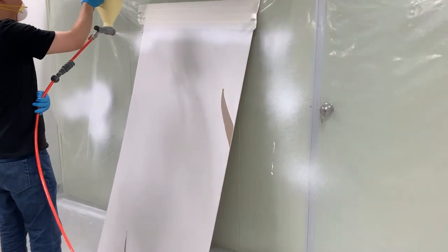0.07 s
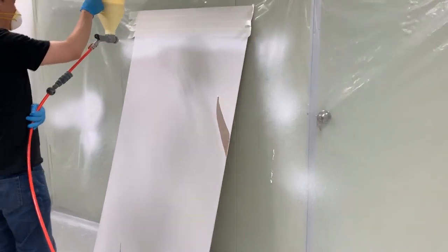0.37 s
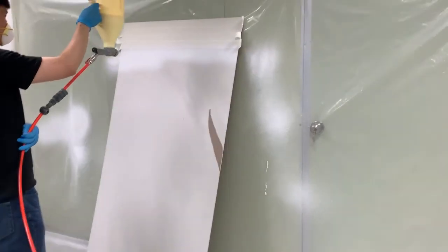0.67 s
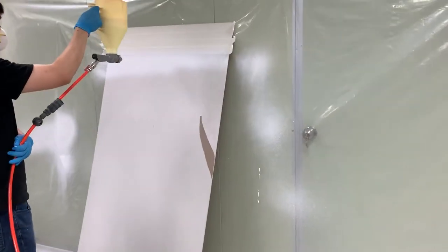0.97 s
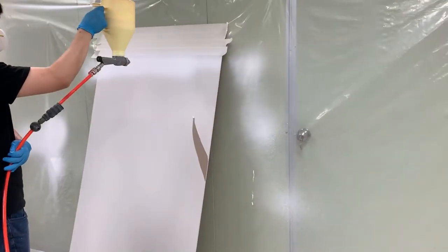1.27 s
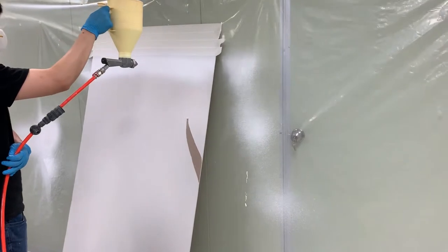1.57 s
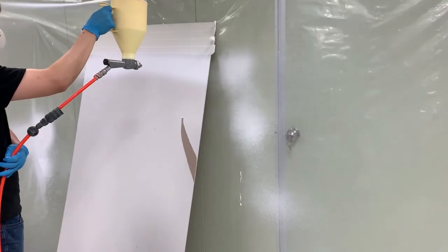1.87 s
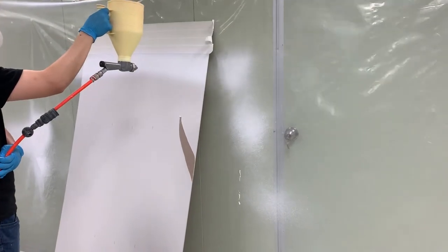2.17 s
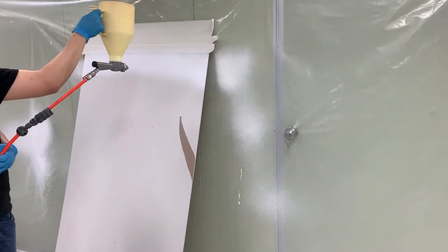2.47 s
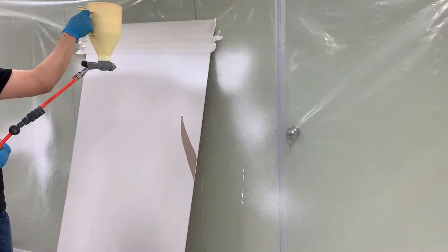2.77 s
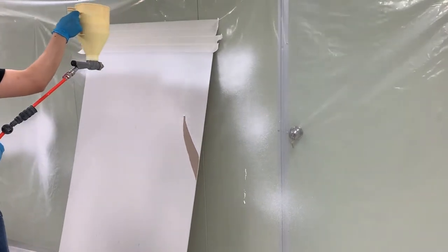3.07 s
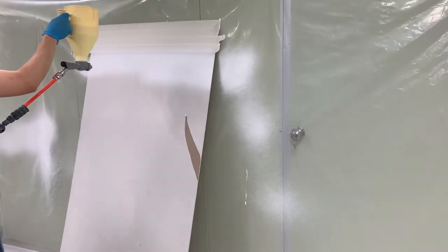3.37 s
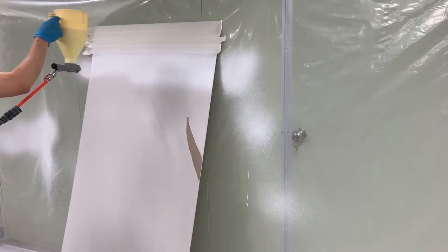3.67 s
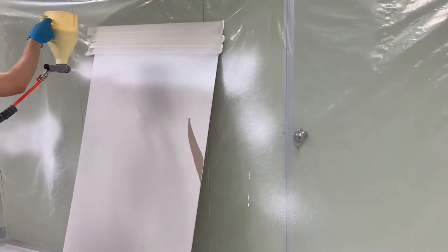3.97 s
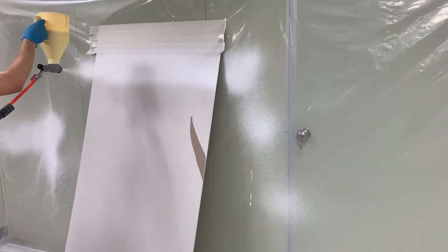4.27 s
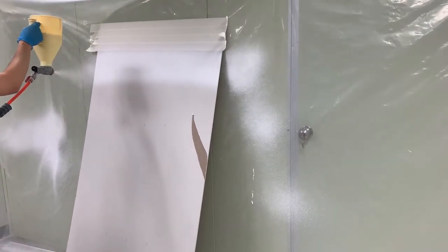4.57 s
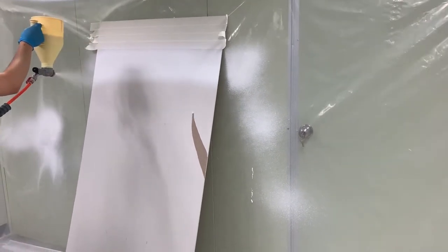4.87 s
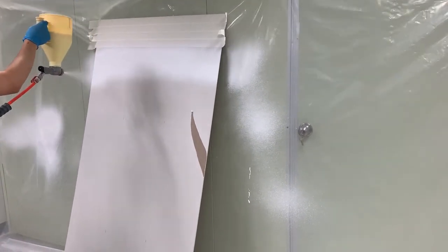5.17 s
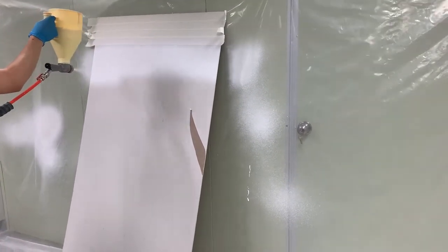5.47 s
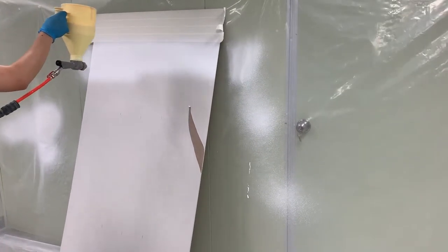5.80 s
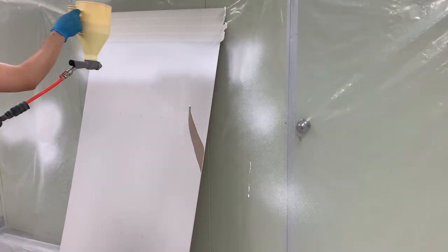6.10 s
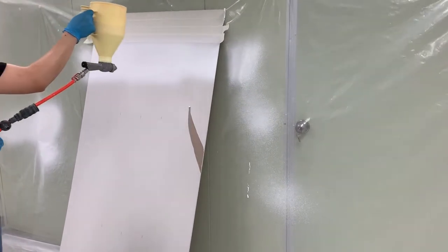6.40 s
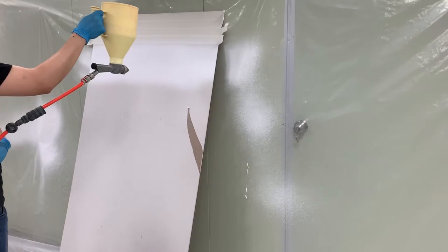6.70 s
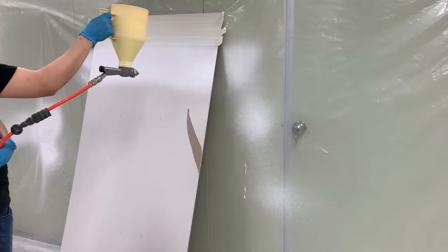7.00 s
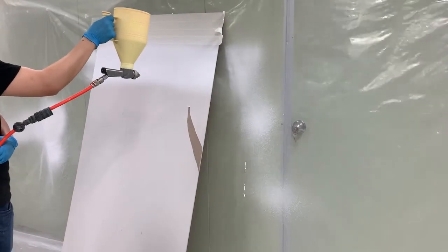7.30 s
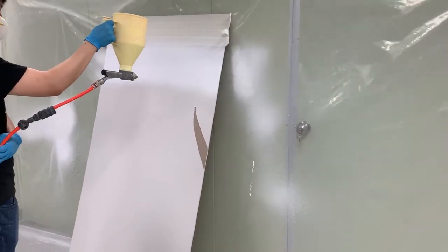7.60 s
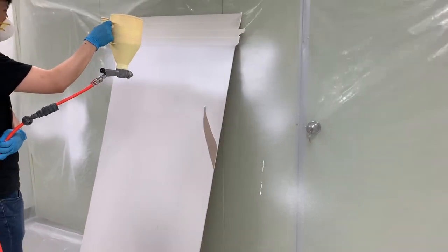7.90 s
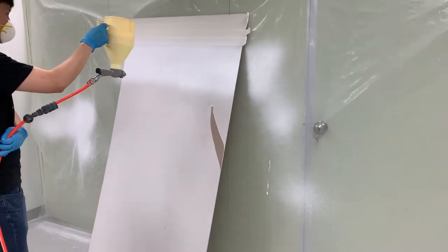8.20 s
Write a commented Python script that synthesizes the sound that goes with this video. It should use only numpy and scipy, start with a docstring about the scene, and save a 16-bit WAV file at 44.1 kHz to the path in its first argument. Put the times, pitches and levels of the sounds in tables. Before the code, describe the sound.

A compressed-air hopper gun sprays mortar onto a panel in a plastic-lined room. Its dense, bright hiss runs without a break, fluttering slightly and carrying a fine sputter of droplets. As the gun sweeps toward the panel and back, the hiss swishes and its hollow tone shifts, wavering most on two close passes. A faint low rumble lies behind it, and the spray sounds wide in stereo.

```python
"""A compressed-air hopper gun sprays mortar on a leaning panel in a plastic-lined room.
Its turbulent jet hisses, flutters with the uneven feed and spits droplets. As the gun sweeps up to
the panel and back, near surfaces return the hiss with changing delays, so it swishes. The top treble
beams straight at the microphone pair; the rest arrives scattered off the sheeting.
Behind it the room rumbles and booms in two low modes."""
import sys
import numpy as np
from scipy import signal
from scipy.fft import rfft, irfft
from scipy.io import wavfile
from scipy.ndimage import uniform_filter1d

SR = 44100
rng = np.random.default_rng(int(sys.argv[2]) if len(sys.argv) > 2 else 0)


def pcm_store(signal):
    """Save signal as 16-bit PCM."""
    levels = np.round(np.clip(np.atleast_2d(signal), -1, 1) * 32767)
    wavfile.write(sys.argv[1], SR, levels.astype(np.int16).T)


N = 363825
TIME, FREQS = np.arange(N) / SR, np.fft.rfftfreq(N, 1 / SR)
FRAME, OVERLAP = 2048, 1536  # samples


def amp(db):
    """Decibels to gain."""
    return 10 ** (np.asarray(db) / 20)


def read(points, hz):
    """A spectrum table at the given frequencies, on a log axis."""
    f, value = np.transpose(points)
    return np.interp(np.log(hz + 1), np.log(f + 1), value)


def follow(rows, t):
    """Each column of a curve table at the given times."""
    times, *columns = np.transpose(rows)
    return [np.interp(t, times, column) for column in columns]


def about_mean(curve, t):
    """A level curve in dB above its own mean, as a column."""
    level_db = follow(curve, t)[0]
    return (level_db - level_db.mean())[:, None]


def swell(t, middle, length):
    """A smooth rise from 0 to 1 and back."""
    return np.cos(np.pi * np.clip((t - middle) / length, -.5, .5)) ** 2


def bell(hz, centre_hz, octaves):
    """A bell-shaped band of height 1 on a log axis."""
    return np.exp(-(np.log2((hz + 1) / centre_hz) / octaves) ** 2)


def wander(low_hz, high_hz):
    """Random motion of rms 1 between two rates."""
    shape = FREQS / (FREQS + low_hz) / (1 + (FREQS / high_hz) ** 2)
    x = irfft(rfft(rng.standard_normal(N)) * shape, N)
    return x / x.std()


def white_frames():
    """Times, frequencies and short-time spectra (frames, bins) of noise at 0 dB per Hz."""
    noise = rng.standard_normal(N) * np.sqrt(SR / 2)
    hz, t, spectra = signal.stft(noise, SR, nperseg=FRAME, noverlap=OVERLAP)
    return t, hz, spectra.T


def to_sound(spectra):
    """Short-time spectra back to samples."""
    return signal.istft(np.swapaxes(spectra, -1, -2), SR, nperseg=FRAME, noverlap=OVERLAP)[1][..., :N]


def delayed(ms, hz):
    """Phase turn of a moving delay, (frames, bins)."""
    return np.exp(-2j * np.pi * ms[:, None] * hz / 1000)


# room tone, alike at both microphones: (frequency [Hz], relative level [dB])
ROOM_RUMBLE = [(10, -84), (30, -84), (42, -58), (70, -72), (82, -59), (100, -62), (118, -67), (135, -70.5),
               (175, -88), (207, -68.5), (245, -90), (600, -110)]
# the room's two modes: (lower [Hz], upper [Hz])
MODE_HZ = [47.3, 63.5]
# their resting levels: (lower [dB], upper [dB])
MODE_REST_DB = [-46, -46.3]
# their swells: (middle [s], length [s], lower lift [dB], upper lift [dB])
MODE_SWELLS = [(.36, 0.75, -1, 11.5), (1.8, 0.46, 5, 7.5), (2.8, 0.32, 6, -3), (3.245, 0.92, 6.5, 2),
               (3.69, 0.42, 11, -12), (4.22, .5, 3, 6), (4.88, 0.42, 2, 8), (5.28, .25, -2, 7),
               (5.606, 0.38, 13, -5), (6.167, .65, 9.5, 6), (6.797, .55, 8, -2), (8.1, .45, 8.5, 5)]


def room_drone(waver_hz=.7, unsteady_db=1.7):
    """Low noise fills the room and booms in two modes, each wavering in pitch and level."""
    noise = rng.standard_normal(N) * np.sqrt(SR / 2)
    drone = irfft(rfft(noise) * amp(read(ROOM_RUMBLE, FREQS) - 1.1), N)
    lifts_db = sum(np.outer(lifts, swell(TIME, middle, length)) for middle, length, *lifts in MODE_SWELLS)
    for mode_hz, rest_db, lift_db in zip(MODE_HZ, MODE_REST_DB, lifts_db):
        rms = amp(rest_db + lift_db + unsteady_db * wander(1.4, 6.8))
        pitch_hz = mode_hz + waver_hz * wander(.61, 4.1)
        drone += rms * np.sqrt(2) * np.sin(2 * np.pi * np.cumsum(pitch_hz) / SR)
    return drone


# two reflections, lagging the direct hiss as the gun sweeps: (time [s], far delay [ms], near delay [ms])
ECHO_DELAYS = [(0, 2.24, 1.63), (.75, 2.29, 1.75), (1.25, 2.416, 1.95), (1.7, 2.488, 2.06),
               (2.15, 2.688, 2.01), (2.55, 2.608, 1.98), (3, 2.47, 1.9), (3.4, 2.422, 1.82),
               (3.7, 2.386, 1.76), (4.05, 2.336, 1.66), (4.55, 2.324, 1.57), (5.2, 2.416, 1.68),
               (6, 2.586, 1.86), (6.55, 2.666, 1.98), (6.9, 2.768, 2.15), (7.35, 2.784, 2.08),
               (7.8, 2.652, 1.95), (8.25, 2.558, 1.8)]
# the gun passes close to the panel: (middle [s], length [s])
PANEL_PASSES = [(2.1, 1.6), (7.4, 0.77)]
# mid-sweep, the far reflection aims at the microphones: (middle [s], length [s])
ON_AXIS_PASSES = [(1.1, 1.2), (3.4, 2.4), (6.35, 1.4), (8.1, 0.83)]
# what the far path carries: (frequency [Hz], relative strength [ratio])
FAR_PATH = [(400, .1), (1000, .85), (2000, .9), (3200, .65), (6000, .5), (8500, 1), (13000, 1.05)]
# the near path, gun at the panel: (frequency [Hz], relative strength [ratio])
NEAR_PATH_CLOSE = [(1200, 0.18), (2200, 0.53), (3800, 1), (6000, 0.24), (9000, 0.95), (13000, 0.43)]
# the near path, gun drawn back; negative comes back inverted: (frequency [Hz], strength [ratio])
NEAR_PATH_BACK = [(250, 0.1), (500, 0.0059), (1100, -0.021), (2200, -0.18), (4000, 0.01)]


def reflections(t, hz, off_axis=.16, on_axis=.29, at_panel=.65):
    """Two echoes comb the hiss; the teeth slide with the gun, and at the panel the near one takes over."""
    far_ms, near_ms = follow(ECHO_DELAYS, t)
    close = sum(swell(t, *row) for row in PANEL_PASSES)[:, None]
    aimed = sum(swell(t, *row) for row in ON_AXIS_PASSES)[:, None]
    far = (1 - close) * np.interp(aimed, [0, 1], [off_axis, on_axis]) * read(FAR_PATH, hz)
    near = close * at_panel * read(NEAR_PATH_CLOSE, hz) + (1 - close) * read(NEAR_PATH_BACK, hz)
    comb = 1 + far * delayed(far_ms, hz) + near * delayed(near_ms, hz)
    return comb / np.sqrt(1 + far ** 2 + near ** 2)


# the plastic around the room, which lets low notes through: (frequency [Hz], relative reflection [ratio])
SHEETING_RETURN = [(300, .2), (1200, .12), (2200, .28), (3200, .5), (5000, .6), (9000, .7), (13000, .5)]


def sheeting_scatter(t, hz, gain, spread_ms, count):
    """Paths off the wrinkled sheeting slide with the sweep of the gun and glint in and out."""
    near_ms = follow(ECHO_DELAYS, t)[1]
    sweep_ms = uniform_filter1d(near_ms - near_ms.mean(), size=20)
    paths = 0
    for place, pace, rate, phase in rng.random((count, 4)):
        glint = np.sqrt(2) * np.cos(2 * np.pi * ((.3 + 1.1 * rate) * t + phase))
        slide_ms = (.4 + 1.2 * pace) * sweep_ms
        paths = paths + glint[:, None] * delayed(spread_ms * (.15 + place) + slide_ms, hz)
    strength = gain * read(SHEETING_RETURN, hz)
    return (1 + strength * paths / np.sqrt(count)) / np.sqrt(1 + strength ** 2)


def panel_body(t, hz, db_per_ms=10.5):
    """From a distance the wide cone of air drums the whole panel; close up it hardly does."""
    near_ms = follow(ECHO_DELAYS, t)[1]
    drawn_back_ms = uniform_filter1d(near_ms.mean() - near_ms, size=20)
    return amp(db_per_ms * drawn_back_ms[:, None] * bell(hz, centre_hz=370, octaves=.89))


# four resonances and a trough in the gap between gun and panel:
# (time [s], lower [Hz], trough [Hz], middle [Hz], upper [Hz], top [Hz])
GAP_PITCHES = [(0, 970, 1130, 1310, 1700, 2300), (0.8, 900, 1060, 1330, 1700, 2250),
               (1.25, 830, 990, 1300, 1880, 2250), (1.6, 770, 935, 1150, 1950, 2380),
               (2.4, 760, 920, 1180, 2030, 2400), (3.1, 840, 1010, 1290, 1990, 2340),
               (3.8, 910, 1055, 1325, 2060, 2520), (4.6, 975, 1090, 1350, 2150, 2560),
               (5.3, 900, 1050, 1305, 2080, 2420), (5.9, 800, 970, 1220, 1930, 2320),
               (6.5, 750, 885, 1130, 1830, 2290), (7.1, 725, 880, 1110, 1740, 2140),
               (8.25, 770, 990, 1180, 1870, 2260)]
# their lifts: (time [s], lower [dB], trough [dB], middle [dB], upper [dB], top [dB])
GAP_LIFTS = [(0, 3, 1, 4, 4.5, 0), (.8, 4, -.5, 1.5, 2, 3), (1.2, .5, -1, 3.5, 1, 2.5),
             (1.65, 2.5, -1.5, 6.5, 5, 2), (2.3, 2.5, -.5, 2, 2, 3), (3.1, 5.5, -.5, 5.5, 2.5, 1),
             (3.8, 5.5, -.5, 6, 2, 1), (4.5, 5, -1, 2.5, 3.5, 2.5), (5.3, 4, -2.5, 5, 2, 0),
             (5.9, 4, -1, 0, 2, 5), (6.5, 4, -3, 3.5, 3, 3), (7.1, 4.5, -5.5, 7.5, 2, 4.5),
             (7.5, 3.5, 0, 4, 0, 0), (8.25, 4, 1, 4, 4, 1.5)]


def hollow_gap(t, hz, width_hz=125):
    """The jet rings hollow in the gap, higher as the gun draws back and lower as it nears the panel."""
    lift_db = 0
    for centre, db in zip(follow(GAP_PITCHES, t), follow(GAP_LIFTS, t)):
        lift_db = lift_db + db[:, None] * np.exp(-(2 * (hz - centre[:, None]) / width_hz) ** 2)
    return amp(lift_db)


# unevenness of the mortar feed at the gun: (time [s], flutter depth [dB])
FEED_UNEVENNESS = [(0, .2), (.7, .35), (1.1, .85), (2.9, .85), (3.3, .6), (4.6, .45), (6.6, .45),
                   (7.4, .85), (8.25, .45)]
# ranges of the hiss that flicker by themselves: (centre [Hz])
FLICKER_BANDS = [900, 3000, 6000, 9200, 13000]


def feed_flutter(hiss, rates_hz=(5, 55)):
    """Lumps of mortar choke the jet many times a second; each range also flickers by itself."""
    depth_db = follow(FEED_UNEVENNESS, TIME)[0]
    choke = wander(*rates_hz)
    spectrum = rfft(hiss)
    fluttering = 0
    for weights in np.eye(len(FLICKER_BANDS)):
        band = irfft(spectrum * read(list(zip(FLICKER_BANDS, weights)), FREQS), N)
        fluttering = fluttering + band * amp(depth_db * (choke + wander(*rates_hz)))
    return fluttering


# larger lumps at the nozzle: (middle [s], length [s], level change [dB])
LUMPS = [(1.3, .07, 1.8), (1.935, .04, -2), (2.29, .07, 1.6), (2.35, .04, -2.2), (2.9, .12, -1.7),
         (3.09, .07, 1.3), (7.31, .04, -1.4), (7.54, .07, 1.4)]


def lump_surges():
    """The whole jet surges or chokes as a large lump passes."""
    return amp(sum(db * swell(TIME, middle, length) for middle, length, db in LUMPS))


# droplets leaving the nozzle: (frequency [Hz], relative level [dB])
DROPLET_SPECTRUM = [(1200, -30), (2600, -3), (4200, 0), (6000, -1), (9000, -16), (16000, -35)]


def sputter(level_db=-37.5, spits_per_s=170, decay_s=.0091, spread_db=7):
    """Droplets tear off the nozzle in short spits, stronger while the feed is uneven."""
    sizes = amp(spread_db * np.minimum(rng.exponential(1, N), 3))
    onsets = rng.random(N) < spits_per_s / SR
    envelope = signal.lfilter([1], [1, -np.exp(-1 / (decay_s * SR))], sizes * onsets)
    envelope *= np.sqrt(follow(FEED_UNEVENNESS, TIME)[0])
    bursts = envelope * rng.standard_normal((2, N))
    spits = irfft(rfft(bursts) * amp(read(DROPLET_SPECTRUM, FREQS)), N)
    return amp(level_db) * spits / spits.std()


# colour drift from the wobbling nozzle: (frequency [Hz], relative depth [dB])
WOBBLE_DEPTH = [(1000, 0), (3000, 1.5), (6000, 1.5), (9500, 1.1), (12000, .8)]


def nozzle_wobble(t, hz):
    """The hiss drifts in slow random patches of colour, deepest while the feed is uneven."""
    patches = rng.standard_normal((len(t), len(hz)))
    for _ in range(2):
        patches = uniform_filter1d(patches, size=24, axis=0)  # along time
        patches = uniform_filter1d(patches, size=20, axis=1)  # along frequency
    uneven = np.sqrt(follow(FEED_UNEVENNESS, t)[0])[:, None]
    return amp(uneven * read(WOBBLE_DEPTH, hz) * patches / patches.std())


# the air jet: (frequency [Hz], relative level [dB])
JET_SPECTRUM = [(150, -73.5), (350, -72.5), (600, -75), (1200, -73), (1700, -70), (2400, -67.5),
                (3200, -64), (4300, -60.5), (6000, -58), (7850, -57), (8050, -51.5), (10500, -54.5),
                (13000, -53), (15700, -54)]
# air rushing on the panel: (time [s], relative level [dB])
RUSH_LEVEL = [(0.0, -38.5), (0.92, -38), (1.17, -39.5), (1.75, -38.5), (1.93, -39.5), (2.07, -38),
              (2.32, -40.5), (2.78, -39), (3.65, -38.5), (5.28, -39), (7.18, -37.5), (7.42, -40.5),
              (7.56, -40), (7.76, -39), (8.25, -38.5)]
# how far each pitch follows the rush: (frequency [Hz], weight [dB per dB])
RUSH_WEIGHT = [(300, 1.2), (1600, 2), (3200, 0.83), (6400, 0)]
# the treble, sinking with the gun furthest from the panel: (time [s], relative level [dB])
TREBLE_LEVEL = [(0, 2.5), (1.0, 1.8), (3.35, 1.8), (4.2, 1), (4.8, -1), (5.4, 0), (6.1, 1.8), (7.0, 1.4),
                (8.25, 1.5)]
# how far each pitch follows the treble: (frequency [Hz], weight [dB per dB])
TREBLE_WEIGHT = [(1600, 0.02), (3600, 0.76), (6400, 0.46), (10000, 0.94)]
# one range swells or thins: (middle [s], length [s], centre [Hz], half width [octaves], lift [dB])
JET_SWISHES = [(0.646, 2.5, 3000, 0.46, 2.5), (.9, 0.56, 330, 0.45, 4.5), (.9, .4, 5500, .16, 2.5),
               (1.115, .44, 8400, 0.2, 2.5), (1.45, 0.62, 6000, .25, -3.5), (1.5, .23, 11300, .3, -5),
               (1.7, 0.26, 3800, 0.65, 2.8), (1.8, 1.7, 570, 0.13, 3), (2.02, .8, 11000, .15, 2),
               (2.097, .31, 3700, 0.57, 5.5), (2.113, .3, 6570, .28, 3.5), (3.2, 1.4, 500, .25, -4),
               (3.297, 0.48, 3900, .45, 2.5), (6.87, 0.26, 10400, .6, -1.7), (6.95, 0.66, 2050, .2, 1.5),
               (7.05, 1.2, 537, .17, 5), (7.35, .3, 5740, .42, 4), (7.5, .39, 8450, .098, -6.5),
               (7.49, .4, 900, .53, -3), (7.62, 0.69, 6900, 0.44, 3)]


def jet_colour(t, hz):
    """The jet's spectrum: rush and treble swell slowly, with brief swishes on top."""
    level_db = read(JET_SPECTRUM, hz) + about_mean(RUSH_LEVEL, t) * read(RUSH_WEIGHT, hz)
    level_db += about_mean(TREBLE_LEVEL, t) * read(TREBLE_WEIGHT, hz)
    for middle, length, centre_hz, octaves, db in JET_SWISHES:
        level_db += db * swell(t, middle, length)[:, None] * bell(hz, centre_hz, octaves)
    return amp(level_db)


# the gun's place: (time [s], closeness [0 drawn back, 1 at the panel])
GUN_CLOSENESS = [(0, .1), (.5, .2), (1.5, .5), (2.35, 1), (3.1, .5), (3.7, 0), (5.8, 0), (6.5, .4),
                 (7.45, 1), (8.25, .4)]
# scattered hiss at the pair, gun drawn back: (frequency [Hz], left-right correlation [-1 to 1])
CORRELATION_BACK = [(60, .86), (500, .94), (1200, .7), (1900, -.35), (2450, .03), (3000, .16), (3600, .07),
                    (4300, .14), (5100, -.5), (5700, -.1), (6300, .5), (7300, -.35), (8100, .5),
                    (9300, -.1)]
# and with the gun at the panel: (frequency [Hz], left-right correlation [-1 to 1])
CORRELATION_CLOSE = [(60, .87), (500, .95), (1200, .82), (1900, -.28), (2450, .1), (3000, .68), (3600, .62),
                     (4300, .65), (5100, -.38), (5700, .15), (6300, .68), (7300, -.78), (8100, .07),
                     (9300, .66)]


def scattered_hiss(t, hz):
    """Hiss off the sheeting reaches the two microphones partly in step, partly in opposition."""
    common, opposed = (white_frames()[2] * sheeting_scatter(t, hz, gain=3.05, spread_ms=19, count=20)
                       for _ in range(2))
    close = follow(GUN_CLOSENESS, t)[0][:, None]
    correlation = (1 - close) * read(CORRELATION_BACK, hz) + close * read(CORRELATION_CLOSE, hz)
    common *= np.sqrt((1 + correlation) / 2)
    opposed *= np.sqrt((1 - correlation) / 2)
    return np.array([common + opposed, common - opposed])


# sound beamed from nozzle to microphones: (frequency [Hz], share of power [0 to 1])
BEAM_SHARE = [(1200, .01), (5000, .06), (9000, .12), (9600, .6), (10500, .8), (11150, .998), (13600, .99),
              (15700, .96)]


def spray_gun(left_lag_s=.0002213, gain_db=.3):
    """Turbulent air heard at the pair: the top beams straight in, the rest arrives scattered."""
    t, hz, turbulence = white_frames()
    room = scattered_hiss(t, hz)
    beam = turbulence * sheeting_scatter(t, hz, gain=.4, spread_ms=14, count=24)
    beam = np.array([beam * np.exp(-2j * np.pi * hz * left_lag_s), beam])
    direct = read(BEAM_SHARE, hz)
    pair = np.sqrt(direct) * beam + np.sqrt(1 - direct) * room
    jet = pair * jet_colour(t, hz) * nozzle_wobble(t, hz)
    hiss = to_sound(jet * panel_body(t, hz) * hollow_gap(t, hz) * reflections(t, hz))
    return amp(gain_db) * lump_surges() * feed_flutter(hiss)


def scene():
    """The spray and its sputter in stereo, with the room's drone centred behind them."""
    return spray_gun() + sputter() + room_drone()


# colour of the microphone pair: (frequency [Hz], left minus right [dB])
PAIR_BALANCE = [(50, -1.6), (250, 0), (600, 2), (1800, 1.7), (3200, 0), (6000, -1), (7900, -.8), (8080, -5),
                (9200, -3.3), (10500, -.5), (11200, 0)]


def record(dry, cutoff_hz=15740):
    """Two microphones in the room, each with its own colour, and a steep treble limit."""
    lean = amp(read(PAIR_BALANCE, FREQS))
    response = np.array([lean, np.ones_like(lean)]) / np.sqrt((1 + lean ** 2) / 2)
    coloured = irfft(rfft(dry) * response, N)
    low_pass = signal.firwin(1023, cutoff_hz, window=("kaiser", 8), fs=SR)
    return signal.oaconvolve(coloured, low_pass[None], "same")


dry = scene()
out = record(dry)
pcm_store(out)
```